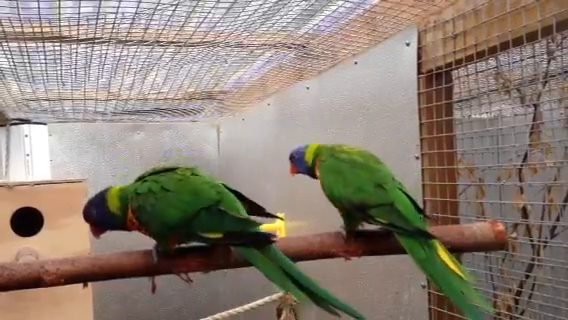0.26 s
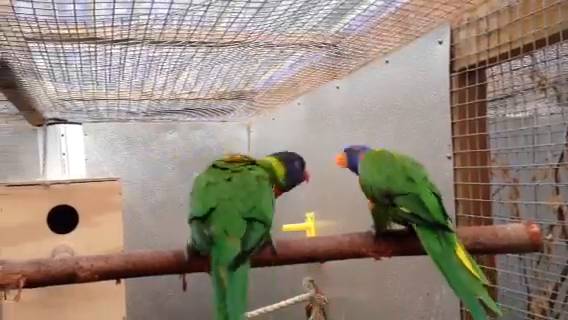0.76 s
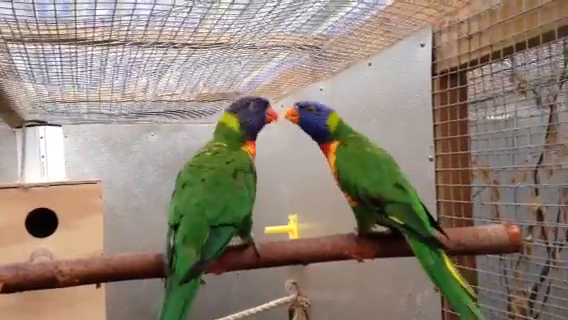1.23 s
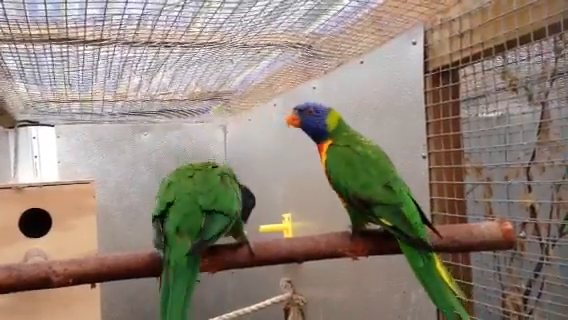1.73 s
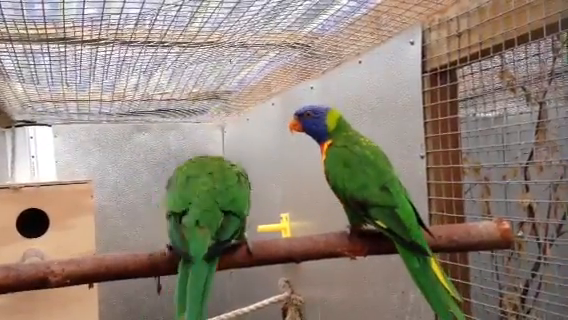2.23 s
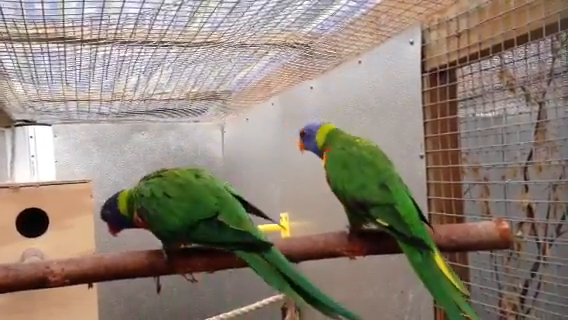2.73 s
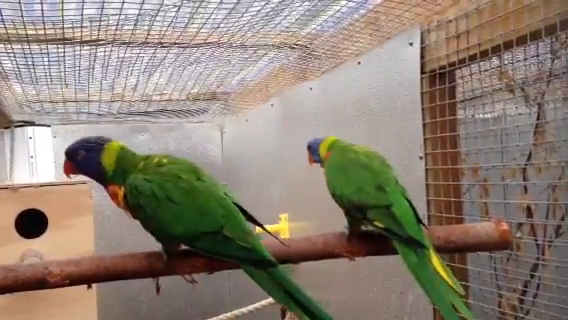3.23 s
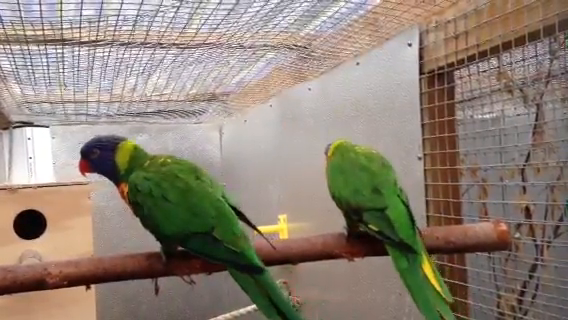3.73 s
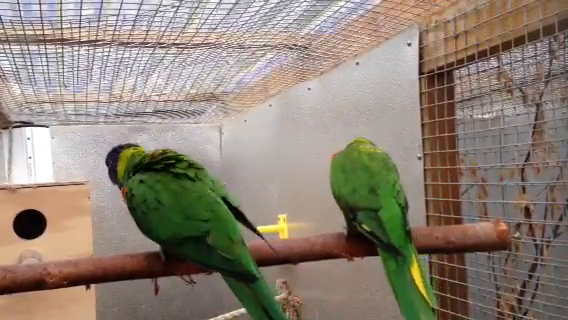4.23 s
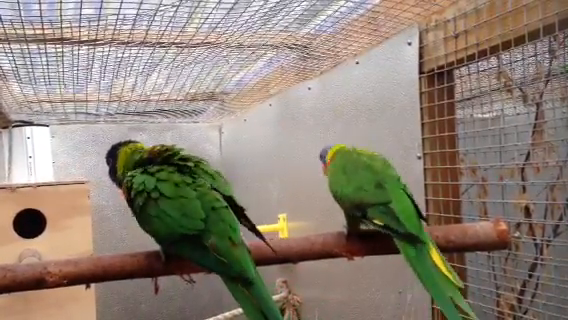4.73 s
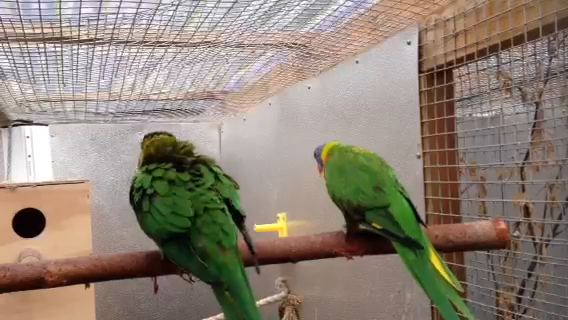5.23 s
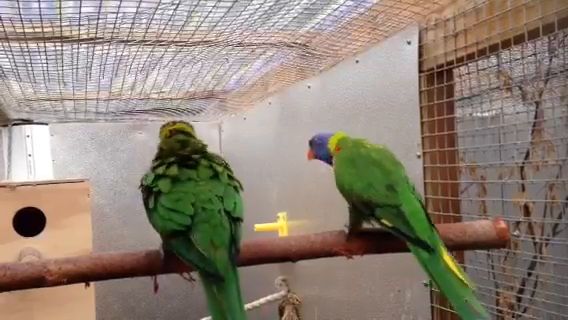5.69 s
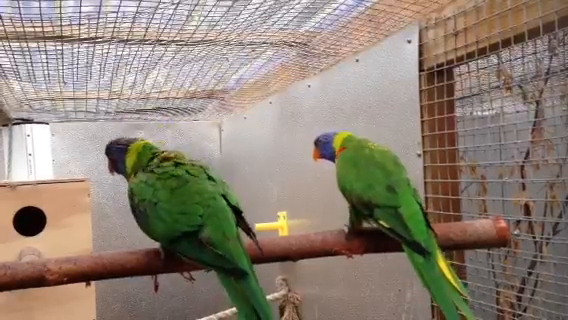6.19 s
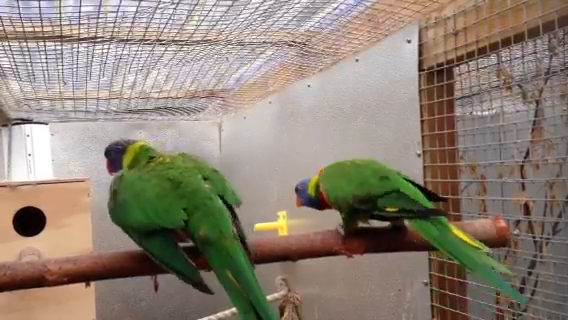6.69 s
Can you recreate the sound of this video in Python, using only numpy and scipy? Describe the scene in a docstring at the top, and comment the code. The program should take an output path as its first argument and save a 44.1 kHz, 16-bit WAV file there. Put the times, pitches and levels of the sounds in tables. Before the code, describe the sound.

Two parrots chatter and screech in short shrill bursts in a small aviary, claws ticking on a wooden perch as distant birds answer.

```python
"""Two rainbow lorikeets chatter and screech on a perch in a small aviary of sheet walls and wire mesh.
Each note is a push of air that buzzes the syrinx, coloured by windpipe, throat and beak.
Other parrots answer from farther off. Claws and beaks tick on wood and wire, and the walls add
quick echoes and a short ring. Under it all lies a soft outdoor rush, in which a far drone
swells and fades."""
import sys
import numpy as np
from scipy import signal
from scipy.fft import rfft, irfft, next_fast_len
from scipy.io import wavfile

SR = 44100
rng = np.random.default_rng(int(sys.argv[2]) if len(sys.argv) > 2 else 0)


def transcribe(u):
    """Save the signal u as a 16-bit wav file named by the first command-line argument.

    u: samples, shape (n,) or (channels, n), limited to [-1, 1]; the rate is SR.
    q: integer samples, one column per channel.
    """
    v = np.clip(np.atleast_2d(u).T, -1, 1)
    q = np.round(v * 32767).astype(np.int16)
    wavfile.write(sys.argv[1], SR, q)


N = 306495
TIME = np.arange(N) / SR

# Soft notes, beak nearly shut; two carry an undertone an octave down. All table levels are pre-mix.
# Each row: start in seconds, length in seconds, crest as a share of the length, first pitch in Hz,
# last pitch in Hz, arch and roughness as shares of the pitch, fundamental in dB, overtones in dB,
# tilt in dB per octave, throat resonance in Hz.
CHATTER_NOTES = [ (0.203, 0.029, .2, 1600, 1390, -.02, 0.012, -32, -56, -3.5, 3900),
                 (0.222, 0.062, 0.99, 742, 779, 0.02, 0.024, -44, -63, 1, 3960),
                 (0.255, 0.034, 0.62, 1516, 1610, -0.011, 0.0088, -31.5, -52, -6, 4200),
                 (0.741, .036, 0.18, 1440, 1556, 0.021, 0.078, -30.5, -48.5, 1.5, 3500),
                 (0.777, 0.036, 0.32, 1440, 1480, -0.05, 0.1, -31, -52, 1, 3770),
                 (0.815, 0.1, 0.31, 1486, 1417, -0.028, 0.12, -33.5, -53, -1.5, 3440),
                 (0.918, .05, 0.21, 1700, 1730, -0.032, 0.086, -31, -50, -0.5, 3570),
                 (0.958, .044, 0.52, 1764, 1717, 0.03, .14, -29, -39.5, -3, 3080),
                 (1.147, 0.036, 0.21, 1816, 1703, 0.00035, 0.07, -23.5, -33, -1, 7560),
                 (2.365, .062, 0.87, 1430, 1483, -0.024, 0.013, -36, -61, 2, 3000),
                 (2.43, 0.038, 0.35, 794, 758, 0.01, 0.029, -41.5, -63, -10, 3900),
                 (2.438, 0.042, 0.62, 1582, 1490, 0.0044, 0.016, -34, -55.5, -1, 4300),
                 (2.506, 0.024, 0.61, 988, 1068, 0.0071, .015, -32.5, -48.5, -8, 3340),
                 (3.104, 0.026, 0.33, 1503, 1480, 0.038, 0.013, -26, -51.5, 6.5, 4800),
                 (3.175, 0.052, 0.53, 1727, 1672, -0.1, .028, -29, -44, -6.5, 4050),
                 (4.119, 0.022, 0.37, 2340, 2416, -0.017, .014, -28, -41, 0, 4000),
                 (4.141, 0.032, 0.33, 2370, 2180, -0.17, 0.048, -40.5, -48, -7, 3870),
                 (4.19, 0.024, 0.39, 1813, 1690, -.06, 0.018, -30.5, -46, -5, 4200),
                 (4.302, 0.021, 0.22, 1817, 2040, 0.028, 0.006, -34, -42, 5, 3800),
                 (4.68, .025, .6, 2190, 2310, .005, .02, -55, -73, 5, 4500),
                 (4.76, 0.025, 0.6, 1976, 2085, 0.019, .012, -44.5, -59, -1, 4900),
                 (5.633, 0.021, 0.54, 1974, 2270, -0.0069, .01, -46.5, -53.5, 2, 5500),
                 (5.662, 0.045, 0.36, 1840, 1790, -0.074, 0.016, -54, -57, 7, 3500),
                 (5.705, 0.032, 0.54, 1787, 1965, 0.013, 0.035, -47.5, -54.5, 3, 3200),
                 (6.855, .019, 0.23, 1580, 1920, 0.033, 0.045, -35, -51.5, 0, 3930),
                 (6.895, 0.015, 0.25, 1810, 1930, .02, 0.032, -32.5, -48, 3, 3680),
                 (6.94, 0.017, 0.54, 1990, 1850, -0.036, .017, -27, -31, -11.5, 7740)]
# Loud notes that leap between registers. Each row reads as in CHATTER_NOTES.
SCREECH_NOTES = [ (0.978, 0.019, 0.15, 1001, 991, .005, 0.045, -35.5, -38, -2, 8050),
                 (1.079, 0.053, 0.32, 1190, 1002, 0.023, 0.078, -27, -31.5, 3, 3180),
                 (3.377, 0.04, 0.6, 2375, 2483, 0.0036, 0.028, -38, -40, 4.5, 4800),
                 (3.405, 0.051, 0.61, 4610, 3067, -0.11, 0.1, -24, -30.5, 3, 3950),
                 (3.452, 0.062, 0.19, 3333, 3437, .12, 0.089, -21.5, -25, -2, 4000),
                 (3.521, 0.066, 0.16, 2850, 2730, 0.016, 0.045, -31, -27.5, -4.5, 6900),
                 (3.525, 0.052, 0.41, 3880, 3990, -0.033, 0.091, -27, -35, -2, 4000),
                 (4.924, 0.017, 0.59, 2706, 2690, -0.014, 0.0067, -16.5, -32, 0.5, 3900),
                 (4.943, 0.028, 0.92, 3340, 3400, 0.027, 0.0058, -19.5, -28, -4, 6900),
                 (4.97, 0.012, 0.19, 3250, 3160, 0.023, .025, -22.5, -27.5, -1, 5200),
                 (4.981, .05, 0.32, 2520, 2420, 0.04, 0.015, -26, -30, -8, 7000),
                 (5.802, 0.0327, 0.75, 1189, 1147, 0.014, 0.015, -27.5, -26, -2.5, 3870),
                 (5.838, .033, 0.59, 1100, 1258, -.03, 0.03, -29.5, -21.5, -1, 3880),
                 (5.863, .035, 0.23, 2366, 2788, 0.053, 0.025, -18.5, -23.5, 8.5, 4690),
                 (6.368, 0.017, 0.26, 959, 911, 0.028, 0.023, -33.5, -32, -3, 3770),
                 (6.386, 0.011, 0.53, 906.5, 937, -0.013, 0.0068, -37.5, -26.5, -4.5, 9000),
                 (6.402, 0.032, 0.43, 926, 910.5, 0.03, 0.0098, -33.5, -29, -4, 8970)]
# Birds farther down the aviary. Each row reads as in CHATTER_NOTES.
ANSWER_NOTES = [ (4.345, 0.1, 0.26, 3890, 3580, .015, 0.11, -50, -50.5, 3, 4000),
                (4.472, 0.053, 0.34, 4370, 3320, -0.13, 0.16, -43, -47, 1.5, 3950),
                (5.467, 0.016, 0.79, 2380, 2510, 0.0017, 0.078, -42, -60, 14, 6700),
                (5.488, 0.05, 0.47, 3410, 4160, 0.05, .1, -34, -47, 11, 3900),
                (5.539, 0.028, 0.49, 5900, 4940, 0.0085, 0.085, -28, -31, 0.5, 4000),
                (6.14, 0.1, 0.057, 3795, 3240, -0.011, 0.059, -45.5, -30, -16.5, 4100),
                (6.537, 0.0437, 0.15, 2789, 2727, -.055, 0.019, -34, -36.5, 8, 5080),
                (6.55, 0.034, 0.15, 3760, 3760, -0.0051, 0.11, -26.5, -42.5, 10.5, 3800),
                (6.665, 0.064, 0.18, 1215, 1207, .003, .005, -57.5, -96, -10, 3720)]
# Birds heard only through the room. Each row reads as in CHATTER_NOTES.
FLOCK_NOTES = [ (2.2, 0.14, .3, 2040, 1920, 0.075, .09, -47, -63, 6, 4000),
               (2.36, 0.13, 0.45, 1900, 1815, -.1, 0.11, -53, -54.5, -19, 4000),
               (2.51, 0.29, 0.52, 2056, 1973, 0.063, 0.078, -46.5, -59.5, -7, 4000),
               (3.73, 0.15, 0.33, 2150, 2070, -.01, 0.112, -45.5, -63, 5, 4000),
               (6.222, 0.053, 0.21, 1678, 1684, -0.02, 0.082, -40.5, -54.5, -11, 4000)]
# How the open beak radiates. Each row: frequency in Hz, gain in dB.
BEAK_EQ = [(1500, -1), (5000, -0.5), (6500, -6.5), (10000, -10.5), (12500, -31), (15000, -30)]
WINDPIPE_HZ, WINDPIPE_WIDTH_HZ, WINDPIPE_DB = 1790, 130, -5.5   # a low resonance common to all notes
# Claws and beaks on perch and wire. Each row: time in seconds, level in dB, offset of the tick in dB.
TAP_HITS = [(0.074, -26.5, -14), (0.166, -20, -23), (0.316, -26.5, -13), (0.436, -20.5, -17),
            (0.539, -35.5, -4), (0.917, -47, -20), (1.058, -27, -25), (1.288, -28, -13), (1.389, -38, -4),
            (1.566, -33.5, -10), (1.662, -27, -8.5), (1.789, -36, -27), (1.886, -29, -12),
            (2.041, -26, -16.5), (2.644, -25, -15), (2.989, -25.5, -13), (3.002, -22, -17),
            (3.074, -19.5, -15), (3.139, -37, -20), (3.173, -29, -8), (3.897, -41, -6), (4.578, -25, -10.5),
            (4.734, -29, -20), (4.8, -30.5, -18), (5.18, -32.5, -16), (5.309, -29.5, -22)]
# The ring of the perch and its mesh. Each row: frequency in Hz, level in dB, 60 dB decay in seconds.
PERCH_MODES = [(440, -10, 0.033), (712, -10.5, 0.039), (1123, -8, 0.032), (1550, -13, 0.019),
               (1949, -11, 0.029), (2445, -21.5, 0.065), (3250, -16.5, 0.019)]
# The aviary's width, length and height. Each row: size, bird position, microphone position, in metres.
AVIARY_AXES = [(1.9, .83, 1.12), (3.7, .62, 1.57), (2.3, 1.61, 1.44)]
SOUND_M_PER_S = 343
# The aviary's ring. Each row: frequency in Hz, 60 dB decay in seconds.
AVIARY_DECAY = [(500, 0.35), (1500, 0.31), (3000, 0.34), (6000, 0.26), (10000, 0.25), (15000, 0.2)]
# The rise and fall of the outdoor rush. Each row: time in seconds, rumble in dB, hiss in dB.
RUSH_LEVELS = [(0.0, -61, -50.5), (0.77, -62, -51.5), (0.97, -62, -45.5), (1.24, -59.5, -50),
               (2.13, -64.5, -54), (2.61, -66, -52), (3.16, -59, -48.5), (4.01, -66.5, -59),
               (4.26, -65.5, -55), (5.3, -66.5, -61), (5.77, -68, -59.5), (6.21, -71.5, -60.5),
               (6.35, -72.5, -62.5), (6.95, -71.5, -70)]
# The low body of the rush. Each row: frequency in Hz, noise density in dB.
RUMBLE_SPECTRUM = [(18, -68), (30, -49.5), (86, -19.5), (156, -2), (214, 0.5), (247, -1), (326, 0),
                   (377, 0.5), (484, -0.5), (700, -2.5), (910, -7.5), (1540, -120)]
# The airy top of the rush. Each row: frequency in Hz, noise density in dB.
HISS_SPECTRUM = [(290, -38), (500, -5), (629, -6), (966, -0.5), (1420, 1), (2480, -5.5), (2950, -5),
                 (4340, -15), (5380, -13.5), (6210, -20), (10100, -28), (14600, -31), (15300, -28)]
# The far drone's two swells. Each row: start in seconds, length in seconds, crest as a share of
# the length, first pitch in Hz, last pitch in Hz, arch as a share of the pitch, level in dB.
DRONE_SWELLS = [(2.0, 1.27, 0.34, 513.3, 592.3, .2, -43), (3.346, 0.5, 0.33, 677, 617, 0.0194, -46)]
DRONE_WANDER_HZ = 25.08   # depth of its slow pitch waver
DRONE_SWELL_DB, DRONE_FADE_DB, DRONE_EDGE_S = 14.5, 8, 0.027
# The microphone's own steady hiss. Each row: frequency in Hz, noise density in dB.
MIC_SPECTRUM = [(50, -20), (200, -6), (8000, 3.5), (15000, -0.5)]
CUTOFF_HZ = 15300


def syrinx(row, swell_db, fade_db, overtones_follow, slack_rough, roughen_db, jitter, flutter_hz,
           flutter_db, rasp, skirt_hz, tremor_hz, attack_s, release_s, throat_db, throat_width_hz):
    """One push of air: an unsteady buzz, rougher when slack, coloured by windpipe, throat and beak."""
    start, length, crest, first_hz, last_hz, arch, roughness = row[:7]
    fundamental_db, overtones_db, tilt_db, throat_hz = row[7:]
    end = start + length
    span = slice(int((start - attack_s) * SR), min(N, int((end + release_s) * SR)))
    t = TIME[span]
    age = np.clip((t - start) / length, 0, 1)
    effort_db = swell(age, crest, swell_db, fade_db)
    pitch = glide(age, first_hz, last_hz, arch)
    rough = abs(roughness) * from_db(roughen_db * (age - .5) - slack_rough * effort_db)
    harsh = rough / (rough + 0.041)
    # a harsh note flutters: its force and its pitch swing together at an uneven rate
    flutter = np.sin(phase_of(flutter_hz * (1 + 0.354 * wobble(91.4, len(t)))))
    swing = jitter * np.tanh(wobble(tremor_hz, len(t))) + 0.4 * flutter
    phase = phase_of(pitch * (1 + rough * swing))
    voice = from_db(fundamental_db + effort_db) * np.sin(phase)
    bright_db = overtones_db + overtones_follow * effort_db
    for k in range(2, int(CUTOFF_HZ / pitch.min()) + 1):
        hz = k * pitch
        throat = resonance(hz, throat_hz, throat_width_hz, throat_db)
        windpipe = resonance(hz, WINDPIPE_HZ, WINDPIPE_WIDTH_HZ, WINDPIPE_DB)
        colour_db = at_hz(BEAK_EQ, hz) + tilt_db * np.log2(hz / 4000)
        gain = windpipe * throat * from_db(bright_db + colour_db) * (hz < CUTOFF_HZ)
        # the windpipe delays each overtone differently; turbulence spreads a skirt of noise round it
        angle = k * phase + 2 * np.pi * rng.random()
        skirt = rasp * harsh * wobble(skirt_hz, len(t))
        voice += gain * (np.sin(angle) + skirt * np.cos(angle))
    force = rms_one(from_db(flutter_db * harsh * flutter))
    gate = np.clip((t - start) / attack_s + 1, 0, 1) * np.clip((end - t) / release_s + 1, 0, 1)
    return span, np.sqrt(2) * voice * force * np.sin(gate * np.pi / 2) ** 2


def bird(notes, **manner):
    """Play a table of notes in one manner; so small a throat radiates no bass."""
    out = np.zeros(N)
    for row in notes:
        span, sound = syrinx(row, **manner)
        out[span] += sound
    return signal.sosfilt(signal.butter(4, 620, "high", fs=SR, output="sos"), out)


def taps(knock_db, tick_db, small_per_s, small_db):
    """Each touch knocks the perch and ticks on the wire; many tiny ones lie between the clear ones."""
    times, peak_db, bright_db = np.transpose(TAP_HITS)
    hits = (times * SR).astype(int)
    hiss_db = curves(RUSH_LEVELS, TIME)[1]   # the tiny touches ride the level of the outdoor hiss
    touches = rng.random(N) < small_per_s / SR
    accent_db = 2.2 * np.minimum(rng.exponential(1, N), 2.5)
    small = touches * from_db(hiss_db + small_db + accent_db)
    knocks, ticks = small.copy(), small * from_db(1)
    knocks[hits] += from_db(peak_db)
    ticks[hits] += from_db(peak_db + bright_db)
    age = TIME[:SR // 10]
    wood = 0
    for hz, mode_db, t60 in PERCH_MODES:
        ring = from_db(mode_db - 60 * age / t60) * np.sin(2 * np.pi * hz * age)
        strikes = knocks * rng.choice([-1, 1], N) * rng.uniform(0.12, 1.06, N)
        wood = wood + signal.oaconvolve(strikes, ring)[:N]
    crack = band(rng.standard_normal(len(age)), 890, 6830) * from_db(-60 * age / 0.012)
    wire = signal.oaconvolve(ticks, crack)[:N]
    return from_db(knock_db) * wood + from_db(tick_db) * wire


def walls(x, bounce_db, order=3):
    """The first echoes: mirror images of the birds in walls, floor and roof, weaker with each bounce."""
    image = np.arange(-order, order + 1)
    offsets = [image * size + np.where(image % 2, size - birds, birds) - mic
               for size, birds, mic in AVIARY_AXES]
    metres = np.linalg.norm(np.meshgrid(*offsets), axis=0).ravel()
    bounces = np.abs(np.meshgrid(image, image, image)).sum(axis=0).ravel()
    lag = np.round((metres - metres.min()) / SOUND_M_PER_S * SR).astype(int)
    gain = (bounces > 0) * from_db(bounce_db * bounces) * metres.min() / metres
    return signal.oaconvolve(x, np.bincount(lag, gain))[:N]


def aviary(x, early_db, early_s):
    """Scattered sound builds up, escapes quickly through the mesh and leaves a darkening tail."""
    age = TIME[:SR // 2]
    edges_hz = np.geomspace(150, 19000, 11)
    response = 0
    for low, high in zip(edges_hz, edges_hz[1:]):
        early = from_db(early_db - 60 * age / early_s)
        tail = from_db(-60 * age / at_hz(AVIARY_DECAY, np.sqrt(low * high)))
        response = response + band(rng.standard_normal(len(age)), low, high) * (early + tail)
    response *= np.clip((age - .003) / 0.006, 0, 1)   # pre-delay and build-up
    return signal.oaconvolve(x, response / np.linalg.norm(response))[:N]


def outdoors(rumble_db, hiss_db):
    """A soft uneven rush: a low and a high bed of noise, each flickering in level."""
    rumble_level, hiss_level = curves(RUSH_LEVELS, TIME)
    rumble = from_db(rumble_level + rumble_db + 1.9 * wobble(41, N)) * coloured(RUMBLE_SPECTRUM)
    hiss = from_db(hiss_level + hiss_db + 2.13 * wobble(32, N)) * coloured(HISS_SPECTRUM)
    return rumble + hiss


def drone(level_db, width_hz):
    """A far drone: a narrow band of noise that glides in pitch as it swells and fades."""
    out = 0
    for start, length, crest, first_hz, last_hz, arch, peak_db in DRONE_SWELLS:
        age = np.clip((TIME - start) / length, 0, 1)
        phase = phase_of(glide(age, first_hz, last_hz, arch) + DRONE_WANDER_HZ * wobble(9.04, N))
        tone = wobble(width_hz, N) * np.sin(phase) + wobble(width_hz, N) * np.cos(phase)
        gate = np.clip(np.minimum(age, 1 - age) * length / DRONE_EDGE_S, 0, 1)
        contour_db = swell(age, crest, DRONE_SWELL_DB, DRONE_FADE_DB)
        out = out + gate * from_db(level_db + peak_db + contour_db) * tone
    return out


def swell(age, crest, swell_db, fade_db):
    """Effort in dB over a sound's life (age 0 to 1): it grows to the crest, then gives way."""
    return np.interp(age, [0, np.clip(crest, .02, .98), 1], [-swell_db, 0, -fade_db])


def glide(age, first_hz, last_hz, arch):
    """Pitch over a sound's life: a slide, arched upward or downward in the middle."""
    return (first_hz + (last_hz - first_hz) * age) * (1 + arch * (1 - (2 * age - 1) ** 2))


def resonance(hz, centre_hz, width_hz, bump_db):
    """A bell-shaped bump added to unity gain."""
    return 1 + from_db(bump_db) / (1 + ((hz - centre_hz) / width_hz) ** 2)


def phase_of(hz):
    """Running phase of a moving pitch."""
    return 2 * np.pi * np.cumsum(hz) / SR


def wobble(rate_hz, size):
    """Random motion up to a given rate, spread about 1."""
    run_in = SR // 5
    lowpass = signal.butter(4, rate_hz, fs=SR, output="sos")
    return rms_one(signal.sosfilt(lowpass, rng.standard_normal(size + run_in)))[run_in:]


def coloured(spectrum):
    """Noise of a given spectrum, rms 1."""
    size = next_fast_len(N)
    gain = from_db(at_hz(spectrum, np.arange(size // 2 + 1) * SR / size))
    return rms_one(irfft(rfft(rng.standard_normal(size)) * gain, size)[:N])


def band(x, low_hz, high_hz):
    """Gentle causal band-pass."""
    bandpass = signal.butter(2, [low_hz, min(high_hz, SR / 2 - 500)], "band", fs=SR, output="sos")
    return signal.sosfilt(bandpass, x + 1e-18)


def curves(rows, t):
    """The columns of a table at the times t."""
    times, *columns = np.transpose(rows)
    return [np.interp(t, times, column) for column in columns]


def at_hz(points, hz):
    """Read a spectrum on a log-frequency axis."""
    f, value = np.transpose(points)
    return np.interp(np.log(np.maximum(hz, 1)), np.log(f), value)


def from_db(db):
    """Decibels to gain."""
    return 10 ** (np.asarray(db) / 20)


def rms_one(x):
    """Scale to rms 1."""
    return x / np.sqrt(np.mean(x ** 2) + 1e-20)


def scene():
    """The mix: near birds are mostly direct sound, far ones mostly room, over the outdoor bed."""
    chatter = bird(CHATTER_NOTES, swell_db=11, fade_db=13, attack_s=0.0043, release_s=0.0041,
                   overtones_follow=1.0, throat_db=14.0, throat_width_hz=350, rasp=0.93, skirt_hz=540,
                   slack_rough=0.296, roughen_db=-1.5, jitter=1.0, tremor_hz=325,
                   flutter_hz=124.5, flutter_db=7.5)
    screeches = bird(SCREECH_NOTES, swell_db=7.5, fade_db=8, attack_s=.006, release_s=0.011,
                     overtones_follow=1.29, throat_db=5.5, throat_width_hz=425, rasp=0.67, skirt_hz=540,
                     slack_rough=0.25, roughen_db=2.5, jitter=1.33, tremor_hz=524,
                     flutter_hz=193.6, flutter_db=3.0)
    answers = bird(ANSWER_NOTES, swell_db=12.0, fade_db=13.5, attack_s=0.0037, release_s=0.0066,
                   overtones_follow=1.0, throat_db=11.0, throat_width_hz=300, rasp=0.93, skirt_hz=450,
                   slack_rough=0.083, roughen_db=5.5, jitter=1.11, tremor_hz=482,
                   flutter_hz=219.0, flutter_db=-2.0)
    flock = bird(FLOCK_NOTES, swell_db=6, fade_db=12.5, attack_s=.02, release_s=.02,
                 overtones_follow=0.52, throat_db=-1.0, throat_width_hz=700, rasp=0.58, skirt_hz=700,
                 slack_rough=0.12, roughen_db=1.5, jitter=1.34, tremor_hz=250,
                 flutter_hz=59.25, flutter_db=2.5)
    tapping = band(taps(knock_db=-4.5, tick_db=3, small_per_s=27, small_db=0.5), 188, 13000)
    near = from_db(-1.91) * (chatter + screeches) + tapping
    far = from_db(-4.0) * answers + from_db(-7.0) * flock
    near_room = walls(near, bounce_db=-9.5) + from_db(-7.0) * aviary(near, early_db=8, early_s=0.11)
    far_room = aviary(far, early_db=-8.0, early_s=0.11)
    bed = outdoors(rumble_db=4.0, hiss_db=0.5) + drone(level_db=-4.5, width_hz=74)
    return (near + from_db(-3.5) * answers + near_room + far_room + bed)[None]


def record(dry):
    """The microphone adds a faint hiss; the top is cut steeply."""
    heard = dry + from_db(-68) * coloured(MIC_SPECTRUM)
    return signal.sosfilt(signal.ellip(12, .1, 90, CUTOFF_HZ, fs=SR, output="sos"), heard)


dry = scene()
out = record(dry)
transcribe(out)
```